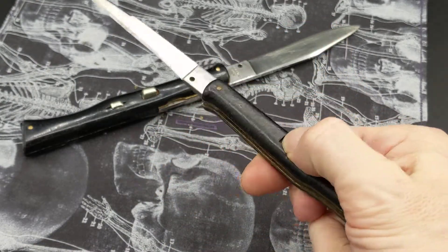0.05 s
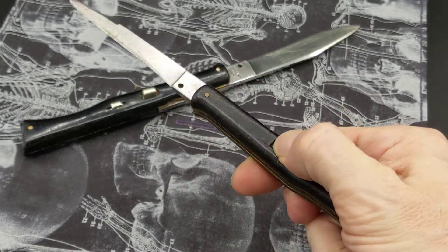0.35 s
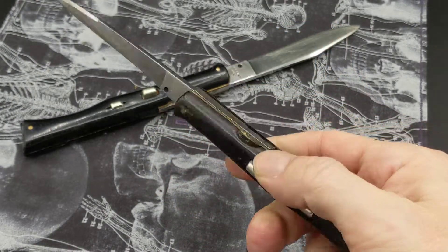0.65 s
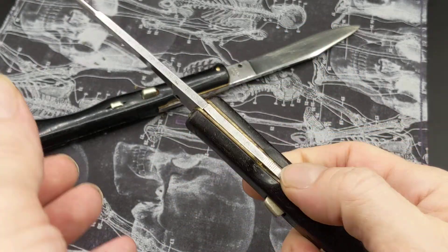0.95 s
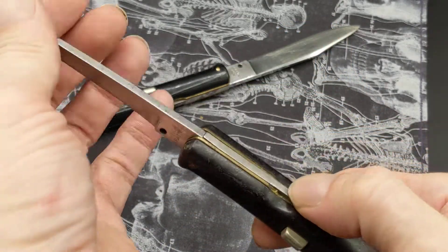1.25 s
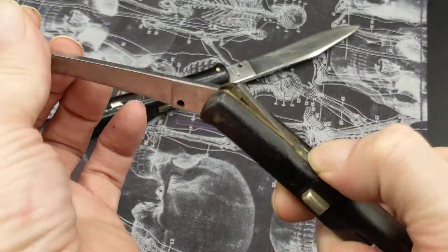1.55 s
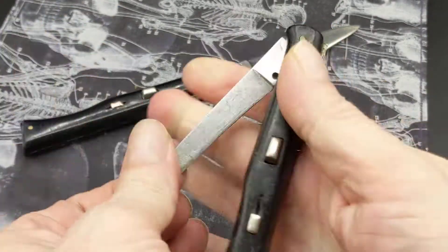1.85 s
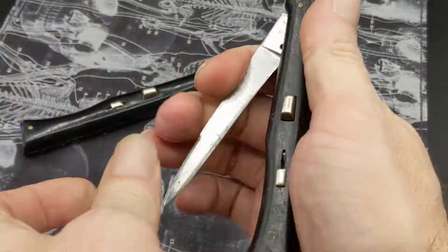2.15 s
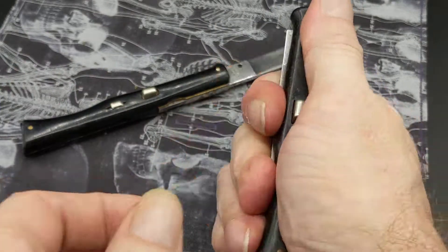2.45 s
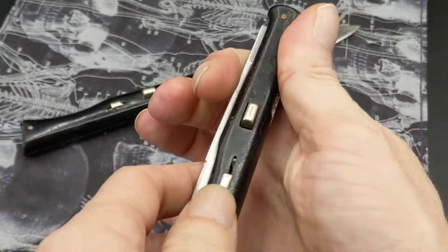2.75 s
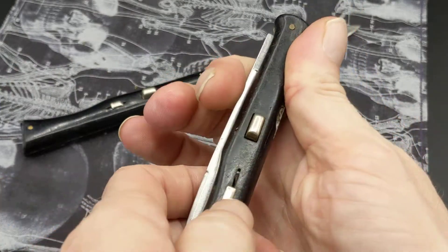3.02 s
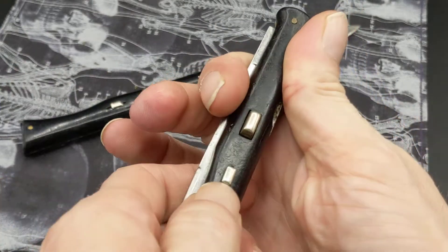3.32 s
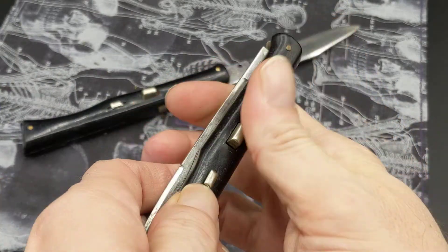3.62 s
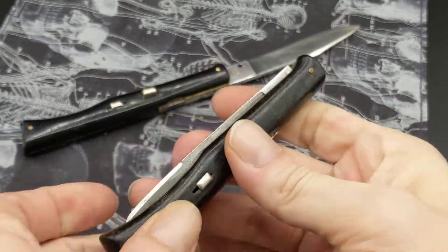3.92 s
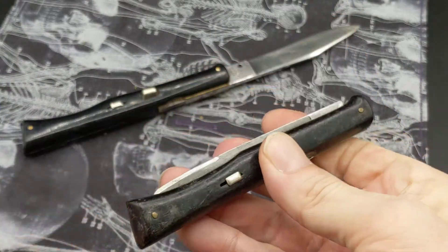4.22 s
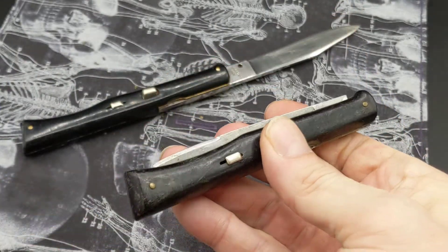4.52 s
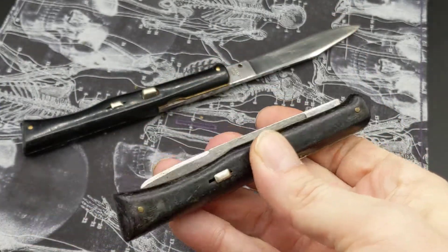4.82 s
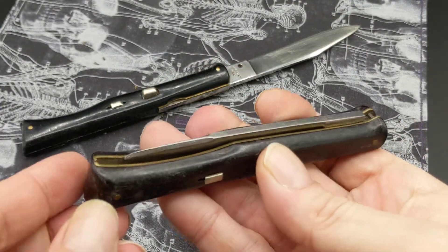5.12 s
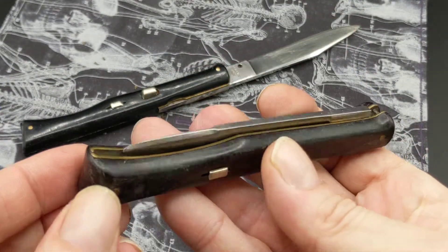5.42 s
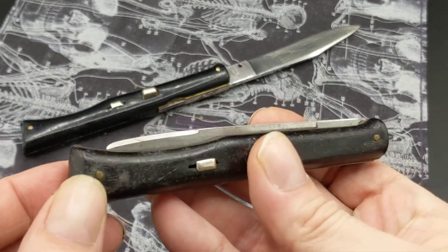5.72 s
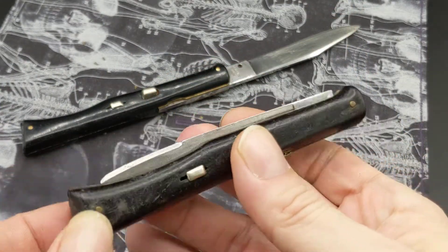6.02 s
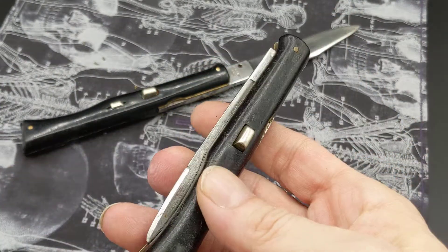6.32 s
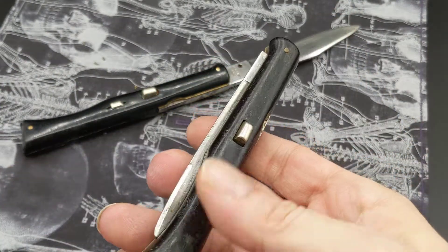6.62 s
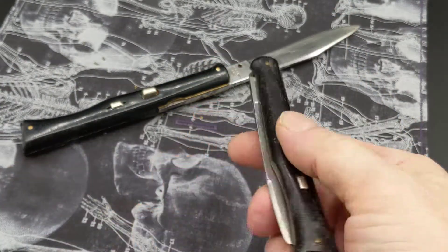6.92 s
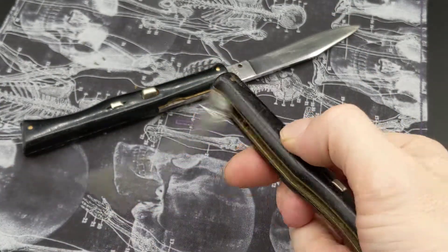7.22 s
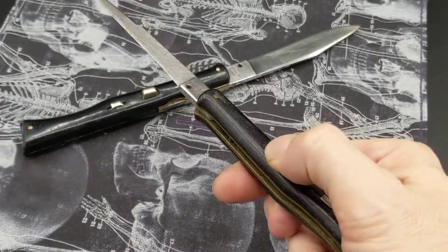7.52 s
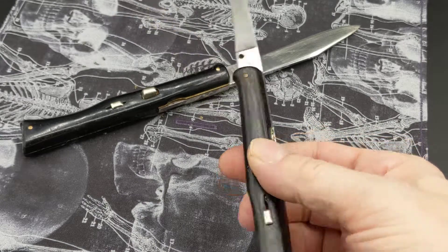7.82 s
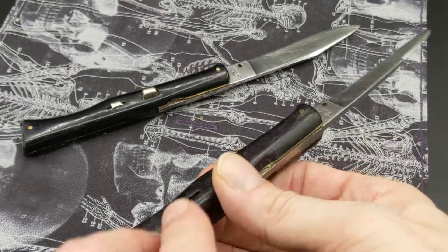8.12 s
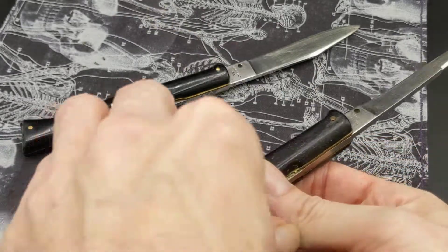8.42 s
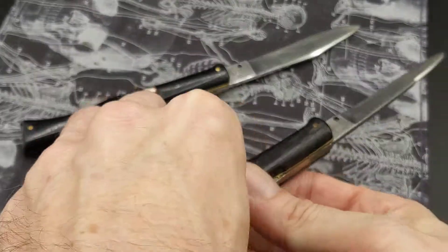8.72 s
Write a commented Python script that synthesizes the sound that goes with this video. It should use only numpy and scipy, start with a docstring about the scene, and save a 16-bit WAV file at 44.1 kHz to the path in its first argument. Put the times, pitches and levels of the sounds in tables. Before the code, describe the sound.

Close to the microphone in a small room, a spring-loaded blade flicks out and locks with a bright metallic crack and a slight thud. It is unlocked and folded shut with a click, then its safety catch clicks. Quiet finger rubs and tiny ticks of loose parts fill the gap before a second sharp opening snap and one light handling click. A faint wandering hum, like a far engine, runs underneath.

```python
"""Small room, close over a table: a spring knife snaps open, is folded shut, has its safety slid and
snaps open again. Each steel blow cracks, rings, flutters between hard surfaces nearby and dies in the
room. Fingers slide on the knife and set its loose parts ticking. Behind it: faint room noise, a rumble
that booms now and then, a deep drone and a low, wandering hum like a far engine."""
import sys
import numpy as np
from scipy import signal
from scipy.fft import rfft, irfft, next_fast_len
from scipy.io import wavfile
from scipy.ndimage import uniform_filter1d

SR = 44100
rng = np.random.default_rng(int(sys.argv[2]) if len(sys.argv) > 2 else 0)


def transcribe(signal):
    """Save signal, clipped to [-1, 1], as a 16-bit WAV file at the path in sys.argv[1]."""
    frames = np.atleast_2d(signal).T
    limited = np.clip(frames, -1, 1)
    pcm = np.round(limited * 32767).astype(np.int16)
    wavfile.write(sys.argv[1], SR, pcm)


N = 394694
SCENE_S = np.arange(N) / SR
HIT_S = np.arange(SR // 4) / SR
BINS_HZ = np.maximum(abs(np.fft.fftfreq(2048, 1 / SR)), 20)
TILT_OCT = np.log2(np.maximum(BINS_HZ, 2000) / 6000)  # octaves re 6 kHz, flat below 2 kHz

# knife modes: f/Hz, level/dB, t60/s
KNIFE_MODES = [(2535, -3, .13), (2745, -1, .16), (2950, -2, .16), (3215, 2, .16), (3480, 0, .14),
               (4240, -2, .13), (4370, 1, .14), (4540, -1, .13), (5665, 1, .14), (6124, -2, .13),
               (6400, -3, .13), (7345, 1, .11), (7770, -3, .1), (9420, -4, .09), (9850, -4, .09),
               (11555, -3, .09), (13420, -4, .08), (15150, -3, .08)]
# blade openings: press t/s, button level/dB, lock t/s, lock level/dB, jolt level/dB, edge shift by grip/Hz
OPENINGS = [(0.1520, -14, 0.1916, -12, -23, 150), (7.3925, -23.5, 7.4282, -10.5, -18, -210)]


def amp(db):
    """dB to gain."""
    return 10 ** (np.asarray(db) / 20)


def unit_rms(x):
    """Scale to rms 1."""
    return x / np.sqrt(np.mean(x ** 2) + 1e-20)


def curve_at(points, hz):
    """Interpolate a table over log frequency."""
    f, value = np.transpose(points)
    return np.interp(np.log(hz + 1), np.log(f + 1), value)


def add(mix, start_s, sound):
    """Mix in at start_s."""
    part = mix[:, max(round(start_s * SR), 0):][:, :sound.shape[-1]]
    part += sound[..., :part.shape[1]]


def colour(x, shape_db):
    """Causal unit-energy filter, shape_db over BINS_HZ."""
    log_gain = np.log(amp(np.maximum(shape_db, -100)))
    response = np.exp(np.conj(signal.hilbert(log_gain)))
    taps = np.fft.ifft(response).real[:len(BINS_HZ) // 2]
    return signal.fftconvolve(x, taps[None] / np.linalg.norm(taps), axes=1)[:, :x.shape[1]]


def resonance(hz, half_width_oct):
    """Peak of height 1 over BINS_HZ."""
    return 1 / (1 + (np.log2(BINS_HZ / hz) / half_width_oct) ** 2)


def waver(rate_hz):
    """Slow random drift, rms 1."""
    size = next_fast_len(N)
    hz = np.fft.rfftfreq(size, 1 / SR)
    spectrum = rfft(rng.standard_normal(size)) / (1 + (hz / rate_hz) ** 4)
    return unit_rms(irfft(spectrum, size)[:N])


def diffuse_noise(spectrum):
    """Noise of rms 1, alike at both ears in the bass."""
    coherence = [(30, 1), (125, 0.97), (250, 0.89), (500, .3), (1000, .5), (2000, 0.055), (8000, 0.024)]  # f/Hz, left-right correlation
    hz = np.fft.rfftfreq(N, 1 / SR)
    left, other = rfft(rng.standard_normal((2, N)))
    alike = np.clip(curve_at(coherence, hz), -1, 1)
    right = alike * left + np.sqrt(1 - alike ** 2) * other
    return unit_rms(irfft(np.array([left, right]) * amp(curve_at(spectrum, hz)), N))


def rumble(start_db=-49.5, fall_db_per_s=0.41):
    """Low noise, slowly receding."""
    spectrum = [(12, -5), (25, -8), (45, 1.5), (65, -10), (85, -6.5), (110, -15), (195, -9.5), (235, -18.5),
                (275, -13.5), (340, -26), (600, -68)]  # f/Hz, density/dB
    return amp(start_db - fall_db_per_s * SCENE_S) * diffuse_noise(spectrum)


def room_noise(level_db=-56.5):
    """Faint steady air."""
    spectrum = [(150, -29), (260, -6.5), (350, -12), (400, -1.5), (482, -9.5), (669, -6.5), (823, -14.5),
                (978, -11), (1200, -15), (1640, -13), (1920, -20), (3060, -19), (6650, -32), (15500, -39.5)]  # f/Hz, density/dB
    return amp(level_db) * diffuse_noise(spectrum)


def harmonics(track, orders, unrest=.2):
    """Multiples of one wandering rate, each unsteady in level and phase."""
    times_s, hz, db = np.transpose(track)
    angle = 2 * np.pi * np.cumsum(np.interp(SCENE_S, times_s, hz)) / SR
    tones = np.zeros(N)
    for order, order_db in orders:
        gain = amp(order_db) * (1 + unrest * waver(rate_hz=8.9))
        tones += gain * np.sin(order * angle + unrest * waver(rate_hz=13))
    return np.sqrt(2) * amp(np.interp(SCENE_S, times_s, db)) * tones


def engine_hum():
    """Far engine, strongest at three times its firing rate."""
    firing = [(0, 46.5, -55.5), (0.6, 46.2, -50.5), (1.0, 42.3, -53.5), (1.5, 43, -62), (2.3, 43, -57.5),
              (2.85, 46.02, -49.5), (3.85, 47.3, -53), (4.15, 47.6, -62), (4.55, 48, -54), (6.8, 49.6, -58),
              (7.5, 51, -70), (8.95, 53.5, -65.5)]  # t/s, firing rate/Hz, level/dB
    orders = [(1, -8.5), (2, -15), (3, 0), (4, -11.5), (6, -17)]  # multiple of the rate, level/dB
    return harmonics(firing, orders)


def drone():
    """Deep tone sinking under the hum."""
    pitch = [(0, 44.8, -52), (1.5, 39.5, -50), (2.3, 42, -54), (2.9, 43.99, -49.5), (3.7, 43.5, -48),
             (4.8, 39, -47), (7.1, 34.5, -52.5), (8.95, 33, -60)]  # t/s, f/Hz, level/dB
    orders = [(1, 0), (2, -12)]  # multiple of the pitch, level/dB
    return harmonics(pitch, orders)


def burst(t60_s):
    """Decaying noise, different at each ear."""
    return rng.standard_normal((2, len(HIT_S))) * amp(-60 * HIT_S / t60_s)


def contact(ring_db, crack_t60_s, flutter_db, flutter_t60_s, rise_s):
    """Steel on steel: crack, flutter between near surfaces, ringing modes."""
    hz, db, t60_s = np.transpose(KNIFE_MODES)[:, :, None]
    phase = rng.random((2, len(KNIFE_MODES), 1))
    modes = amp(db - 60 * HIT_S / t60_s) * np.sin(2 * np.pi * (hz * HIT_S + phase))
    ring = amp(ring_db) * modes.sum(1) / np.linalg.norm(amp(db))
    crack = burst(crack_t60_s)
    flutter = amp(flutter_db) * burst(flutter_t60_s)
    return (crack + flutter + ring) * (1 - np.exp(-HIT_S / rise_s))


def radiation_db(edge_hz, tilt_db_oct, leak_db):
    """Small parts radiate only a weak leak below their lowest mode, edge_hz."""
    crack = [(100, 3), (500, -1), (1200, -2), (2500, 0), (3300, 1), (5000, -2), (7200, -1), (10000, -3),
             (12500, -4), (15500, -2)]  # contact spectrum: f/Hz, density/dB
    highpass = 1 / (1 + (edge_hz / BINS_HZ) ** 14)
    low_cut_db = 20 * np.log10(highpass + amp(leak_db) * (1 - highpass))
    return curve_at(crack, BINS_HZ) + tilt_db_oct * TILT_OCT + low_cut_db


def strike(part, level_db, shift_hz=0):
    """One blow on a part: steel contact plus handle knock."""
    # per part: edge/Hz, tilt/(dB/oct), peak/Hz, peak lift/dB, knock/dB, ring/dB, flutter/dB, leak/dB
    parts = { "button": (2280, -2.5, 2550, 6, -7.5, -9.5, 4.5, -28),
             "spring": (2250, -1.1, 7400, 5.5, -9, -15, -.5, -26),
             "stop": (2680, -.3, 4350, 5.5, -1, -13, 4, -20),
             "latch": (2680, 2.5, 9800.5, 2, -4, -14.5, 4.5, -23.5),
             "catch": (2250, 0, 5848.5, 7.5, -7.5, -24.5, 2, -18),
             "liner": (1420, -0.8, 1800, 5, -7.5, -21, -1.5, -18.5),
             "safety": (2800, 1.5, 6750, 4.5, -11, -19.5, 1, -19),
             "release": (2300, 5.5, 15000, 3, -5, -22, 0, -21),
             "handle": (2550, -4.5, 3962, 14.5, -4, -27, 2, -26)}
    parts["low_ring"] = (2280, -2.5, 2550, 6, -7.5, -9.5, 4.5, -28)  # of the light handling click
    handle = [(100, -9.5), (400, -7), (800, -5.5), (1500, -7), (2300, 1.5), (4000, 12.5), (6000, -5),
              (15000, -24)]  # knock of the handle scales: f/Hz, density/dB
    edge_hz, tilt_db_oct, peak_hz, lift_db, knock_db, ring_db, flutter_db, leak_db = parts[part]
    hit = contact(ring_db, crack_t60_s=.0038, flutter_db=flutter_db, flutter_t60_s=.069, rise_s=.00035)
    peak_db = lift_db * resonance(peak_hz, half_width_oct=.1)
    steel = colour(hit, radiation_db(edge_hz + shift_hz, tilt_db_oct, leak_db) + peak_db)
    knock = colour(burst(t60_s=.0089)[:1], curve_at(handle, BINS_HZ))  # mono, damped by the hand
    return amp(level_db) * (steel + amp(knock_db) * knock)


def blows(kick_delay_s=.0056, kick_db=-9, latch_delay_s=.005, latch_re_stop_db=-3):
    """Opening: button frees blade, spring kicks it, it hits the stop, latch drops. Other blows singly."""
    # unlocking, folding, safety, then a light handling click with its lower ring: t/s, level/dB, part
    single_blows = [(1.788, -30, "release"), (2.05, -40, "catch"), (2.5143, -28, "catch"),
                    (2.5345, -26, "catch"), (2.5385, -10.5, "liner"), (2.5403, -18.5, "catch"),
                    (3.839, -11, "safety"), (8.6322, -48, "low_ring"), (8.6331, -33.5, "handle")]
    out = np.zeros((2, N))
    for press_s, button_db, lock_s, lock_db, _, shift_hz in OPENINGS:
        add(out, press_s, strike("button", button_db, shift_hz))
        add(out, press_s + kick_delay_s, strike("spring", kick_db, shift_hz))
        add(out, lock_s, strike("stop", lock_db, shift_hz))
        add(out, lock_s + latch_delay_s, strike("latch", lock_db + latch_re_stop_db, shift_hz))
    for start_s, db, part in single_blows:
        add(out, start_s, strike(part, db))
    return out


def jolts(delay_s=.001, rise_s=.003, fade_s=.075, swing_hz=5.4,
          thud_hz=125, thud_t60_s=.065, thud_db=-18, pan_db=1.5):
    """Blade locks: an air pressure step swings back to rest, a thud passes through the hand."""
    envelope = (1 - np.exp(-HIT_S / rise_s)) * np.exp(-HIT_S / fade_s)
    step = envelope * np.cos(2 * np.pi * swing_hz * HIT_S)
    thud = amp(thud_db - 60 * HIT_S / thud_t60_s) * np.sin(2 * np.pi * thud_hz * HIT_S)
    out = np.zeros((2, N))
    for _, _, lock_s, _, db, _ in OPENINGS:
        add(out, lock_s + delay_s, amp(db) * (step + thud))
    return out * amp([[-pan_db], [pan_db]])


def slide(pressure, tilt_db_oct, grain_db=2, grain_samples=90):
    """Skin sticks and slips in fine grains, as loud as it is pressed."""
    skin = [(300, -14.5), (1900, -14.5), (2900, 0.5), (5000, -1.5), (7000, -1), (10000, -6), (13000, -6.5),
            (16000, -7.5)]  # friction spectrum: f/Hz, density/dB
    grains = unit_rms(uniform_filter1d(rng.standard_normal(len(pressure)), grain_samples))
    friction = pressure * amp(grain_db * grains) * rng.standard_normal((2, len(pressure)))
    return colour(friction, curve_at(skin, BINS_HZ) + tilt_db_oct * TILT_OCT)


def rubs(rise_s=.031, grip_db=-78.5, swell_db=2.5):
    """Finger strokes on steel and handle, over a faintly shifting grip."""
    strokes = [(0.548, .075, -56, 2), (0.71, .1, -61, -2), (0.83, 0.097, -56, 0), (1.045, .12, -52.5, 1),
               (1.29, .35, -60, -3), (1.845, .035, -57.5, 3), (1.975, 0.082, -52.5, 0),
               (2.175, 0.061, -50.5, 0.5), (2.49, .012, -49.5, -3), (2.665, 0.071, -56, 3),
               (3.338, 0.077, -56.5, -0.5), (3.69, 0.041, -55.5, -1), (4.02, .25, -66.5, 3),
               (4.37, 0.17, -61, 4), (4.53, .05, -58.5, 4), (5.14, .046, -57.5, 1),
               (6.415, .078, -58.5, -3.5), (7.12, .06, -63, 5), (7.87, .076, -62, 7),
               (8.29, 0.16, -62, -1.5), (8.76, 0.24, -62, -4)]  # t/s, decay constant/s, level/dB, tilt/(dB/oct)
    out = slide(amp(grip_db + swell_db * waver(rate_hz=2.5)), tilt_db_oct=-2)
    t = np.arange(SR) / SR
    for start_s, fade_s, db, tilt_db_oct in strokes:
        pressure = np.minimum(t / rise_s, 1) * np.exp(-np.maximum(t - rise_s, 0) / fade_s)
        add(out, start_s, slide(amp(db) * pressure, tilt_db_oct))
    return out


def tick(level_db, tilt_db_oct, peak_hz, edge_hz=2400, leak_db=-15, lift_db=10):
    """Two loose parts touch softly."""
    touch = contact(ring_db=-6.5, crack_t60_s=.016, flutter_db=3.5, flutter_t60_s=.075, rise_s=.00045)
    peak_db = lift_db * resonance(peak_hz, half_width_oct=.15)
    return amp(level_db) * colour(touch, radiation_db(edge_hz, tilt_db_oct, leak_db) + peak_db)


def ticks(tiny_per_s=.7):
    """The knife is turned: clear ticks, plus tiny ones at random times and modes."""
    clear_ticks = [(0.6316, -55.5, -7, 4100), (1.829, -54, -2, 3700), (1.864, -51.5, -9, 2550),
                   (1.949, -54.5, -2, 4100), (2.7005, -49.5, -9, 3920), (3.216, -58.5, -5, 4370),
                   (3.4385, -49, 2, 6020), (3.7185, -56.5, -1.5, 2760), (4.4423, -46.5, 2, 14500),
                   (4.542, -49.5, 2, 14500), (4.573, -50.5, 3, 14500), (5.0436, -60.5, -4, 11600),
                   (5.1215, -50.5, 1, 14500), (6.0989, -55, -4.5, 3680), (6.1302, -60, -2.5, 3550),
                   (6.4258, -58, -5, 2970), (6.4992, -55, -1, 3000), (6.7935, -53.5, -4.5, 3550)]  # t/s, level/dB, tilt/(dB/oct), peak/Hz
    out = np.zeros((2, N))
    for start_s, db, tilt_db_oct, peak_hz in clear_ticks:
        add(out, start_s, tick(db, tilt_db_oct, peak_hz))
    for when, which in rng.random((round(tiny_per_s * N / SR), 2)):
        mode_hz = KNIFE_MODES[int(which * len(KNIFE_MODES))][0]
        add(out, when * N / SR, tick(level_db=-62.5, tilt_db_oct=-5, peak_hz=mode_hz))
    return out


def blade_whisper(start_s=1.1, length_s=.68, level_db=-60.5, peak_hz=2980, lift_db=24, tilt_db_oct=-4):
    """A fingertip drawn along the open blade feeds one resonance by smooth friction."""
    stroke = signal.windows.tukey(round(length_s * SR), .8)
    friction = stroke * rng.standard_normal((2, len(stroke)))
    shape_db = lift_db * resonance(peak_hz, half_width_oct=.32) + tilt_db_oct * TILT_OCT
    out = np.zeros((2, N))
    add(out, start_s, amp(level_db) * colour(friction, shape_db))
    return out


def booms(unrest_rad=.3):
    """The rumble swells briefly on one unsteady pitch."""
    swells = [(3.4, 1.05, 82.7, -52.5), (4.3, 0.98, 206.8, -58), (7.49, 0.54, 72, -55),
              (7.95, 0.52, 59, -48.5)]  # t/s, length/s, f/Hz, level/dB
    out = np.zeros(N)
    for start_s, length_s, hz, db in swells:
        envelope = amp(db) * np.sin(np.pi * np.clip((SCENE_S - start_s) / length_s, 0, 1))
        out += envelope * np.sin(2 * np.pi * hz * SCENE_S + unrest_rad * waver(rate_hz=10))
    return out


def room(x, wet_db=-19, build_s=.0028):
    """Add a short diffuse tail, longest near 3 kHz."""
    decay = [(300, .2), (3200, .27), (7000, .24), (11000, .21), (16000, .18)]  # f/Hz, t60/s
    hz, t, noise = signal.stft(rng.standard_normal((2, SR // 2)), SR, nperseg=256)
    tail = signal.istft(noise * amp(-60 * t / curve_at(decay, hz)[:, None]), SR, nperseg=256)[1]
    tail *= 1 - np.exp(-(np.arange(tail.shape[1]) / SR / build_s) ** 2)
    tail /= np.linalg.norm(tail[0])
    return x + amp(wet_db) * signal.fftconvolve(x, tail, axes=1)[:, :N]


def scene():
    """Knife in its room, slightly right, over the background."""
    background = rumble() + booms() + room_noise() + engine_hum() + drone()
    knife = room(blows() + rubs() + blade_whisper() + ticks()) * amp([[-.3], [.3]])
    return knife + jolts() + background


def record(dry, cutoff_hz=16000):
    """Microphone housing colours the treble; then soft clipping and band limit."""
    housing = [(4175, 380, 2), (5686, 600, 5), (7520, 420, 4), (9570, 770, 5), (11650, 470, 4),
               (13900, 600, 4.5), (16700, 900, -2.5)]  # resonances: f/Hz, width/Hz, gain/dB
    housing_db = sum(db / (1 + (2 * (BINS_HZ - hz) / width_hz) ** 2) for hz, width_hz, db in housing)
    clipped = np.tanh(colour(dry, housing_db))
    lowpass = signal.firwin(1001, cutoff_hz, window=("kaiser", 7), fs=SR)
    return signal.oaconvolve(clipped, lowpass[None], "same")


dry = scene()
out = record(dry)
transcribe(out)
```